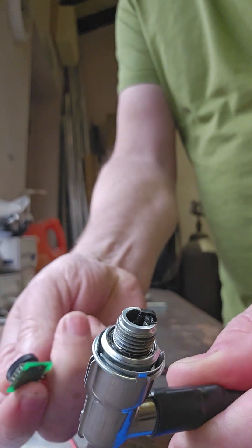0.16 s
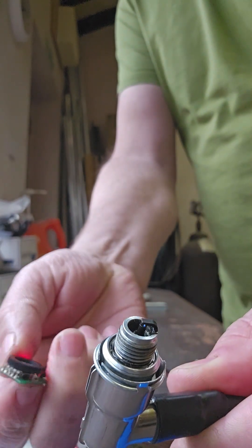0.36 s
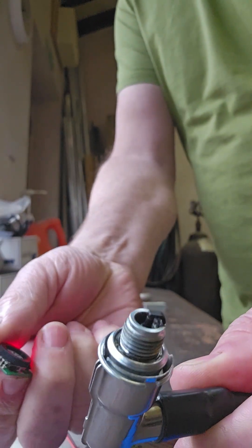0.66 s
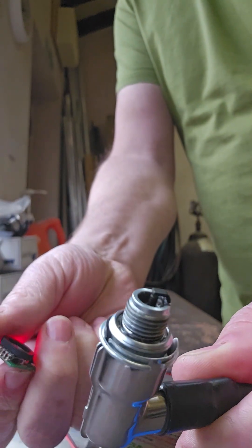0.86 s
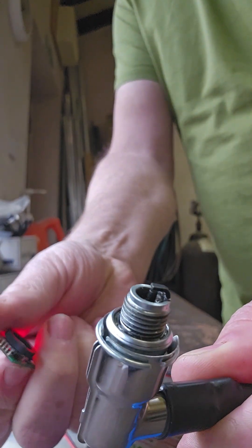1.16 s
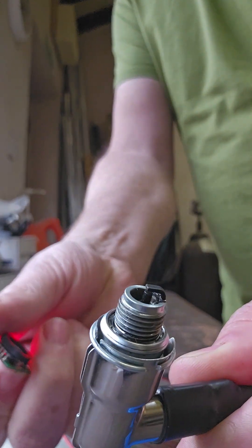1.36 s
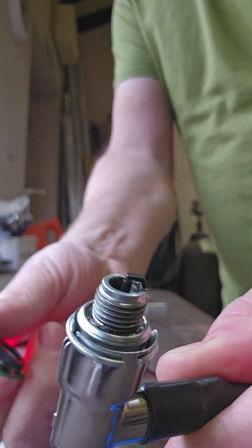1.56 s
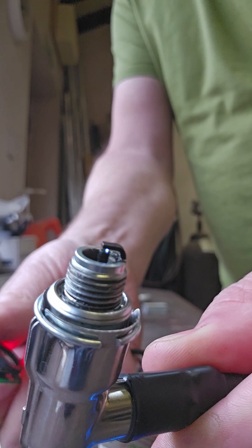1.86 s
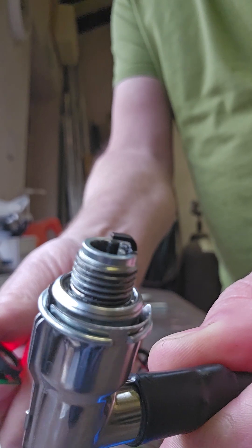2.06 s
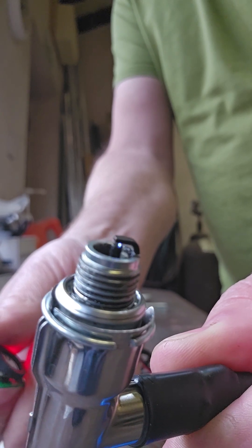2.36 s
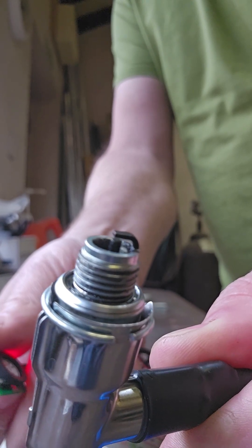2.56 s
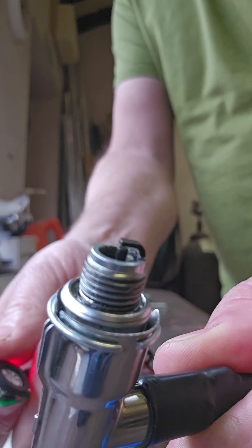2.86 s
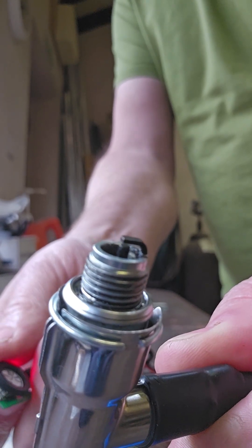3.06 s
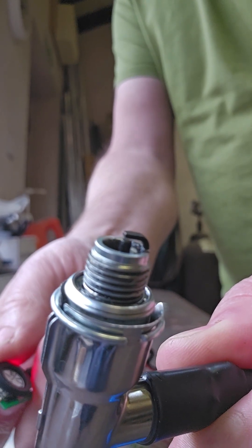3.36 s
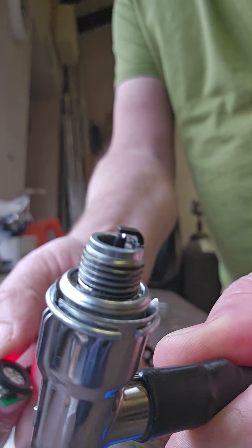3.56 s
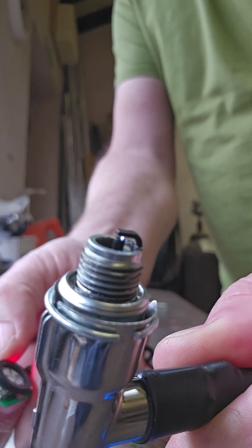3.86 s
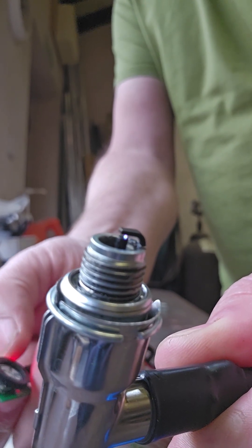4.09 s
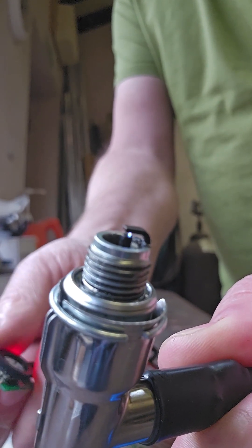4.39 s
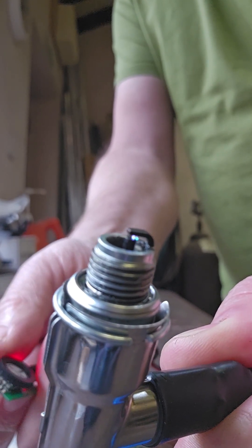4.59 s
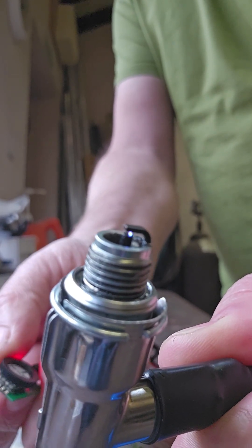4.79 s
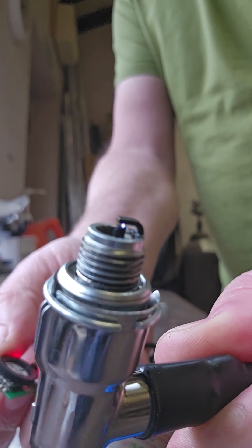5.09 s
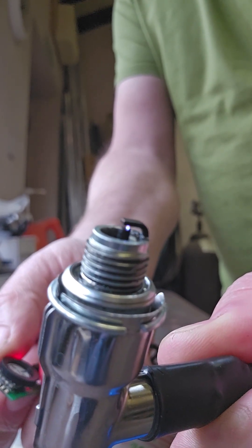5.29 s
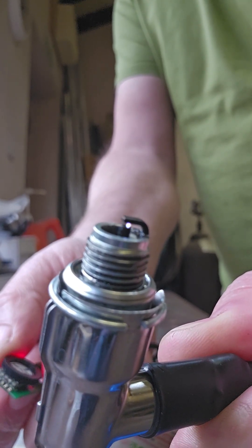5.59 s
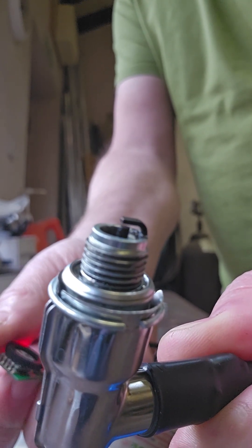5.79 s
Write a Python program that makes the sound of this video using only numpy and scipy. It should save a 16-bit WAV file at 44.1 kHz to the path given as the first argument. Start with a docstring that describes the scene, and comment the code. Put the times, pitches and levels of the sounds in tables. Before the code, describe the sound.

Bright, dry electric snaps, close-miked in stereo, begin as a quick rattle with a quiet knock underneath. They spread into lone ticks about seven a second, some with a dull pop at the right, then gather pace into a rough buzz. A steady, bright, nasal whine follows for about a second before the sparks slow abruptly. A small room gives short reflections over faint hiss and rumble.

```python
"""A rattling run of sparks opens over faint hiss; one soft knock falls near the start.
A spark plug, a few centimetres from a stereo microphone in a small workshop, is fired by an ignition unit.
A knob slows the sparks to lone ticks, speeds them into a buzz and a steady whine, and backs off again.
Each spark is an impulse coloured by port resonances and reflections; overload of one port adds a dull pop.
The knock is a sum of decaying modes, and the hiss is shaped noise."""
import sys
import numpy as np
from scipy import signal
from scipy.fft import rfft, irfft
from scipy.io import wavfile
from scipy.ndimage import map_coordinates

SR = 44100
rng = np.random.default_rng(int(sys.argv[2]) if len(sys.argv) > 2 else 0)


def to_wav(sig):
    """Store sig (one row per channel, or 1-D mono) as 16-bit WAV at the path in sys.argv[1].

    Samples outside -1..1 are clipped; the rate is SR.
    """
    pcm = np.clip(np.atleast_2d(sig), -1, 1) * 32767
    pcm = np.round(pcm).astype(np.int16)
    wavfile.write(sys.argv[1], SR, pcm.T)  # frames by channels


N = 261865

# still air of the workshop, relative noise density: pitch_hz, level_db (per Hz)
AIR_SPECTRUM = [(25, -7.5), (80, 1.5), (200, -16), (300, -26), (700, -29.5), (2000, -35), (3000, -40.5),
                (8000, -23.5), (16000, -76)]
AIR_DB = -68.5  # RMS of the part common to both ports

# runs of sparks, timed by the knob: time_s, rate_per_s
OPENING_RUN = [(0.0098, 46.5), (0.2979, 48.4), (0.3825, 50.07), (0.5013, 39.28)]
SPEED_UP = [(2.9293, 29.37), (3.0381, 36.25), (3.1376, 32.62), (3.2336, 36.73), (3.501, 39.18),
            (3.7636, 49.21), (4.0558, 105.2), (4.3739, 118.1), (4.4269, 98.16), (4.6056, 172.4),
            (4.611, 124.6), (4.6674, 154), (4.699, 377)]
WHINE = [(4.6995, 374.4), (4.93, 375.7), (5.15, 376.2), (5.681, 375.2)]
BACK_OFF = [(5.6822, 373), (5.7104, 149.5), (5.8496, 63), (5.9362, 51.4)]
# mean strength of the sparks in a run: time_s, level_db
RUN_LEVEL = [(0, 7.5), (0.5, 8.5), (2.93, 6.5), (3.57, 6), (3.63, 8), (3.85, 7), (4.03, 6), (4.09, 8.5),
             (4.4, 4), (4.54, 5), (4.61, 8), (4.66, 5), (4.75, 5), (5.06, 0), (5.2, 2), (5.66, 2),
             (5.75, 5)]
# lone ticks while the knob is turned down: start_s, level_db, right_overload (0-1)
TICKS = [(0.5279, 8.5, 0.07), (0.556, 9, 0.06), (0.5862, 8, 0.2), (0.6246, 9, 0.02), (0.693, 8.5, 0.08),
         (0.7643, 8, 0.04), (0.8695, 8.5, .4), (0.9922, 8.5, 0.06), (1.1068, 7, 0.52), (1.2343, 8, 0.02),
         (1.3856, 6, 0.12), (1.525, 6.5, 0.37), (1.6645, 4, 0.02), (1.8098, 6.5, 1), (1.9529, 5, 0.03),
         (2.0914, 6, 0.49), (2.2155, 6, 0.5), (2.3384, 6.5, 0.85), (2.456, 5.5, 0), (2.5663, 4.5, 0),
         (2.6612, 7, 1), (2.7353, 7, .75), (2.7964, 6, 0.53), (2.8489, 5, 0.51), (2.8926, 5.5, .75)]

# the gap's place as the hand moves:
# time_s, left_lead_ms, top_octave_db, hollow_ring_db, left_minus_right_db
GAP_AIM = [(0, 0.18, -6, -27.5, -5), (1.3, 0.24, -8.5, -25, -6), (2.4, 0.31, -4, -37, -2),
           (3.4, 0.3, -4.5, -36, -1), (3.8, 0.309, -2.5, -75, -1.5), (5.2, 0.3, -9.5, -74, -2.5)]
LEAD, TOP, HOLLOW, PAN = 1, 2, 3, 4  # columns of GAP_AIM
# colour of a snap at each port, with the port's cavity peak and notch: pitch_hz, level_db
LEFT_PORT = [(1200, -37.5), (2650, -37), (3150, -26), (5800, -14.5), (7300, -9.5), (7850, -8.5),
             (8350, 0.5), (8800, 1.5), (9400, -19.5), (10100, -24.5), (11400, -11.5), (13000, -6),
             (15700, -3.5), (16600, -28)]
RIGHT_PORT = [(1200, -42.5), (2650, -41), (3150, -20.5), (4050, -24), (4850, -9), (5600, -13.5),
              (6450, -5.5), (7700, -11.5), (8700, -4.5), (9400, -42), (10600, -50), (11800, -10.5),
              (15600, -13.5)]
# rings that each snap sets off in the hollow of the hands and in the steel cap
HOLLOW_HZ, HOLLOW_WIDTH_HZ = 2100, 400
CAP_HZ, CAP_WIDTH_HZ = 3680, 200
# duct of a microphone port
DUCT_HZ, DUCT_WIDTH_HZ = 7150, 3500
# faint low ring under the whine
WHINE_RING_HZ, WHINE_RING_WIDTH_HZ, WHINE_RING_DB = 1175, 170, -46

# chance that a spark in a run overloads the right port: time_s, chance (0-1)
POP_CHANCE = [(2.9, 0), (2.92, 1), (3.3, .95), (3.57, .65), (3.58, 0), (5.83, 0), (5.84, .75)]
# overload (0-1) of a popping spark, its scatter, and the overload of any other spark in a run
POP_MEAN, POP_SPREAD, POP_LEAST = .62, .3, .01
POP_DB, SNAP_LOSS = -10, 0.65  # at full overload: level of the pop, share of the snap that is lost
# ring of a pop; level and scatter from spark to spark are relative to the pop
BARK_HZ, BARK_WIDTH_HZ, BARK_DB, BARK_SPREAD = 2900, 1000, -11, .7

KNOCK_START_S, KNOCK_DB = 0.1138, -43
# modes of the knocked body: pitch_hz, level_db, t60_s
KNOCK_MODES = [(202.07, -10, 0.12), (388, 10, 0.031), (525, -1, 0.068), (780, -21, 0.031)]
CUTOFF_HZ = 16500


def from_db(db):
    """Logarithmic level: converts decibels to an amplitude gain."""
    return 10 ** (np.asarray(db) / 20)


def curve(rows, s, axis=1):
    """Linear interpolation: reads one column of a table at the times s."""
    rows = np.array(rows)
    return np.interp(s, rows[:, 0], rows[:, axis])


def gain_at(spectrum, hz):
    """Spectral envelope: joins decibel points on a log-frequency axis and returns gains."""
    points = np.array(spectrum)
    level_db = np.interp(np.log(hz + 1), np.log(points[:, 0]), points[:, 1])
    return from_db(level_db)


def cut(x, hz, kind, order=2):
    """Butterworth filtering: maximally flat low- or high-pass."""
    sections = signal.butter(order, min(hz, .45 * SR), kind, fs=SR, output="sos")
    return signal.sosfilt(sections, x + 1e-18)


def resonate(x, hz, width_hz):
    """Damped resonance: a two-pole filter with gain about 1 at its peak."""
    r = np.exp(-np.pi * width_hz / SR)
    zeros = np.array([1, 0, -1]) * (1 - r * r) / 2
    poles = [1, -2 * r * np.cos(2 * np.pi * hz / SR), r * r]
    return signal.lfilter(zeros, poles, x + 1e-18)


def convolve(x, response):
    """Linear superposition: passes x through an impulse response."""
    return signal.fftconvolve(x, response)[:N]


def drift(per_s, s):
    """Slow random wander: a smooth curve through random knots, of spread about 1, read at the times s."""
    knots = rng.standard_normal(int(per_s * N / SR) + 3)
    return map_coordinates(knots, [s * per_s], mode="nearest")


def scatter(start_s, t60, level_db):
    """Exponential decay: a cloud of reflections from start_s on, with total energy level_db."""
    age = np.arange(SR // 2) / SR - start_s
    decay = (age > 0) * from_db(-60 * np.maximum(age, 0) / t60)
    cloud = rng.standard_normal(len(age)) * decay
    return from_db(level_db) * cloud / np.sqrt(np.sum(cloud ** 2))


def air(side_db=-8, wide_above_hz=250):
    """Partial coherence: faint rumble nearly alike in both ports, under hiss that differs between them."""
    hz = np.arange(N // 2 + 1) * SR / N
    mid, side = rfft(rng.standard_normal((2, N))) * gain_at(AIR_SPECTRUM, hz)
    width = np.minimum(from_db(side_db) * np.hypot(1, hz / wide_above_hz), 1)
    mid, side = irfft(mid, N), irfft(side * width, N)
    return from_db(AIR_DB) * np.array([mid + side, mid - side]) / np.std(mid)


def run(rates, looseness=0.015, jitter_s=3e-6, uneven_db=1.0):
    """Phase accumulation: the unit fires once a cycle, loosely while it waits, tightly at its top rate."""
    s = np.arange(rates[0][0], rates[-1][0], 1 / SR)
    cycles = np.cumsum(curve(rates, s)) / SR
    fired = np.interp(np.arange(int(cycles[-1]) + 1), cycles, s)
    # waiting beyond the period of the whine loosens the timing
    wait_s = 1 / curve(rates, fired) - 1 / WHINE[-1][1]
    chance = rng.standard_normal((len(fired), 3))
    wander_s = 1.6e-5 * drift(18, fired)
    fired = fired + wander_s + (jitter_s + looseness * wait_s) * chance[:, 0]
    snap_db = curve(RUN_LEVEL, fired) + uneven_db * chance[:, 1]
    popping = rng.random(len(fired)) < curve(POP_CHANCE, fired)
    overload = np.where(popping, POP_MEAN + POP_SPREAD * chance[:, 2], POP_LEAST)
    return np.column_stack([fired, snap_db, overload])  # columns as in TICKS


def clicks(s, heights, size=12):
    """Band-limited sampling: windowed-sinc impulses at exact times, also between samples."""
    at = np.floor(s * SR).astype(int)[:, None] + np.arange(1 - size, size + 1)
    offset = at - s[:, None] * SR
    shape = np.sinc(offset) * np.cos(np.pi * offset / (2 * size)) ** 2
    places = np.clip(at, 0, N).ravel()
    return np.bincount(places, (heights[:, None] * shape).ravel(), N + 1)[:N]


def arrivals(s, heights, cooling_s=0.0067, count=4):
    """Multipath: each snap comes straight and off the thread and fingers, as hand and arc move."""
    sway, fickle, path_db, path_t60 = .35, .7, -11, .0045
    # a gap that is still hot guides the next arc along the same channel
    cooled = 1 - np.exp(-(np.diff(s, prepend=-1) / cooling_s) ** 2)
    out = clicks(s, heights)
    for path in range(count):
        share = sway * drift(9, s) + fickle * cooled * rng.standard_normal(len(s))
        out = out + convolve(clicks(s, heights * share), scatter(0, path_t60, path_db))
    return out


def ringing(spectrum, size=1024):
    """Minimum phase: folding the cepstrum gives a causal impulse response with the given colour."""
    log_gain = np.log(gain_at(spectrum, np.arange(size // 2 + 1) * SR / size))
    cepstrum = irfft(log_gain)
    cepstrum[1:size // 2] *= 2
    cepstrum[size // 2 + 1:] = 0
    return irfft(np.exp(rfft(cepstrum)))


def surroundings():
    """Reverberation: decaying reflections from the hand and plug body, the bench and the workshop."""
    hand_and_body = scatter(start_s=.0012, t60=.035, level_db=-13)
    bench_echo = scatter(start_s=.008, t60=.015, level_db=-21)
    workshop = scatter(start_s=0.0075, t60=0.27, level_db=-19.0)
    return hand_and_body + bench_echo + cut(workshop, 11000, "low", order=1)


def port(s, snap_db, colour, split_hz=10200, cap_db=0, lowest_hz=800):
    """Directivity and resonance: a beamed top octave follows the aim; port and surroundings ring."""
    now = np.arange(N) / SR
    snaps = arrivals(s, from_db(snap_db))
    low = cut(cut(snaps, split_hz, "low"), split_hz, "low")
    top = cut(cut(snaps, split_hz, "high"), split_hz, "high")
    top = top * from_db(curve(GAP_AIM, now, TOP))
    hollow = resonate(snaps, HOLLOW_HZ, HOLLOW_WIDTH_HZ) * from_db(curve(GAP_AIM, now, HOLLOW))
    direct = cut(convolve(low + top, ringing(colour)) + hollow, lowest_hz, "high")
    direct = direct + from_db(cap_db) * resonate(direct, CAP_HZ, CAP_WIDTH_HZ)
    # all-pass: the duct holds the treble back a little, which spreads the snap into a short burst
    direct = direct - 2 * resonate(direct, DUCT_HZ, DUCT_WIDTH_HZ)
    return direct + convolve(direct, surroundings())


def pops(s, overload):
    """Overload: the port gives a dull one-sided pop, with a resonant bark that differs every time."""
    heights = from_db(POP_DB) * overload
    barks = heights * (from_db(BARK_DB) + BARK_SPREAD * rng.standard_normal(len(s)))
    thud = cut(clicks(s, heights), 116, "high")
    return thud + resonate(clicks(s, barks), BARK_HZ, BARK_WIDTH_HZ)


def spark_plug(left_db=0, right_db=-0.1, left_pop_db=-20, pop_delay_s=.00002):
    """Shock waves: each spark snaps; as it overloads the right port, its snap yields to a pop."""
    whine = run(WHINE)
    sparks = np.vstack([run(OPENING_RUN), TICKS, run(SPEED_UP), whine, run(BACK_OFF)])
    s, snap_db, overload = sparks[np.argsort(sparks[:, 0])].T
    overload = np.clip(overload, 0, 1)
    lead_s = curve(GAP_AIM, s, LEAD) / 1000
    pan_db = curve(GAP_AIM, s, PAN)
    loss_db = 20 * np.log10(1 - SNAP_LOSS * overload)
    left = port(s - lead_s / 2, snap_db + pan_db / 2 + left_db, LEFT_PORT)
    right = port(s + lead_s / 2, snap_db - pan_db / 2 + loss_db + right_db, RIGHT_PORT)
    pop = pops(s + lead_s / 2 + pop_delay_s, overload)
    whine_clicks = clicks(whine[:, 0], from_db(whine[:, 1] + WHINE_RING_DB))
    ring = resonate(whine_clicks, WHINE_RING_HZ, WHINE_RING_WIDTH_HZ)
    return np.array([left + from_db(left_pop_db) * pop, right + pop]) + ring


def knock(left_db=-9, right_db=3):
    """Modal vibration: a soft blow sets a few low modes ringing, and the room answers."""
    age = np.maximum(np.arange(N) / SR - KNOCK_START_S, 0)
    body = np.zeros(N)
    for hz, mode_db, t60 in KNOCK_MODES:
        envelope = from_db(KNOCK_DB + mode_db - 60 * age / t60)
        body += envelope * np.sin(2 * np.pi * hz * age)
    room = [convolve(body, scatter(start_s=0.025, t60=0.21, level_db=-11.5)) for side in range(2)]
    return body * from_db([[left_db], [right_db]]) + room


def scene():
    """Superposition: sparks and knock add to the still air."""
    return air() + spark_plug() + knock()


def record(dry):
    """Band limiting: a steep elliptic low-pass cuts the top."""
    sections = signal.ellip(10, .3, 80, CUTOFF_HZ, fs=SR, output="sos")
    return signal.sosfilt(sections, dry)


dry = scene()
out = record(dry)
to_wav(out)
```